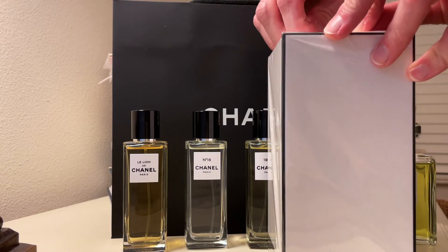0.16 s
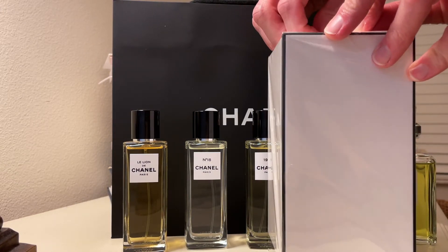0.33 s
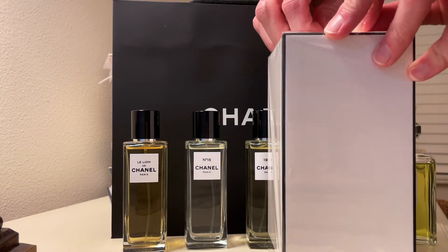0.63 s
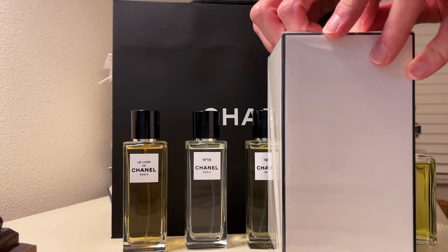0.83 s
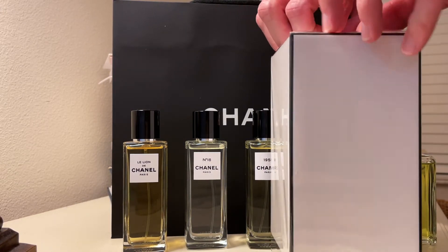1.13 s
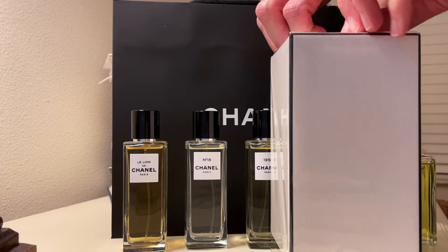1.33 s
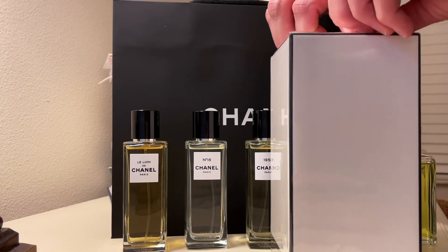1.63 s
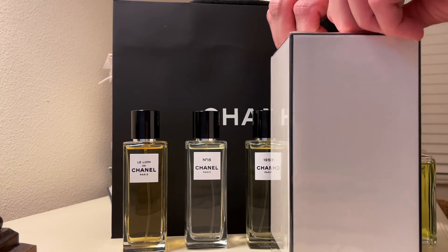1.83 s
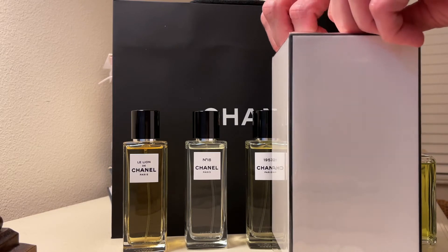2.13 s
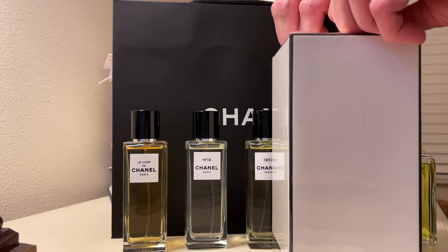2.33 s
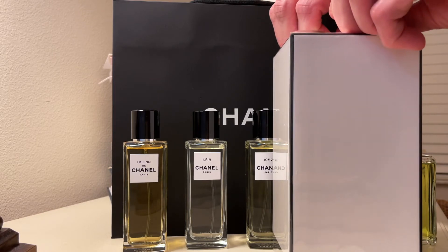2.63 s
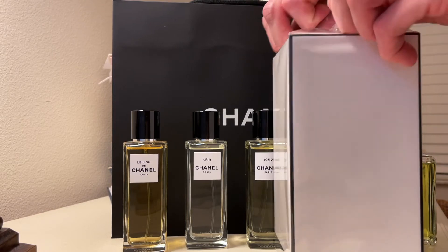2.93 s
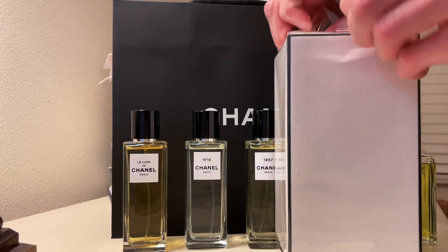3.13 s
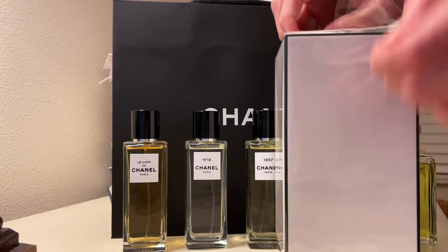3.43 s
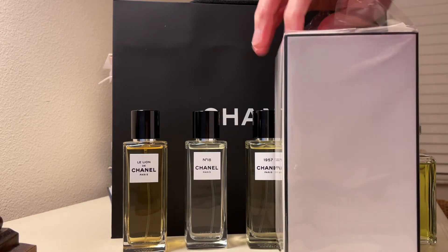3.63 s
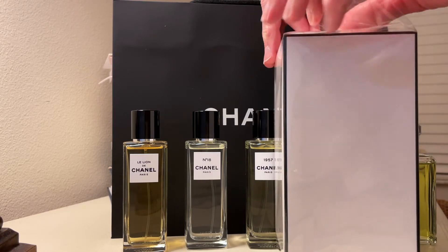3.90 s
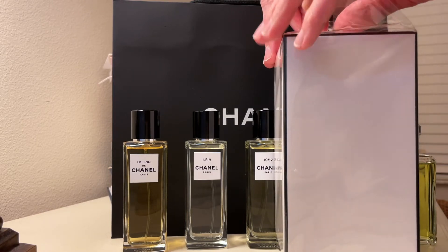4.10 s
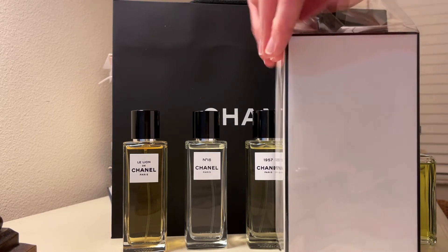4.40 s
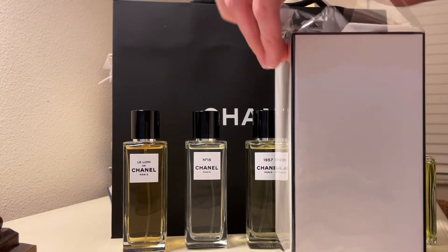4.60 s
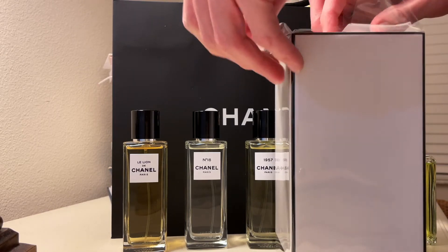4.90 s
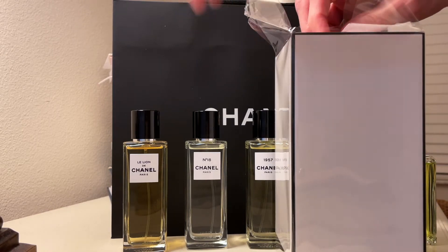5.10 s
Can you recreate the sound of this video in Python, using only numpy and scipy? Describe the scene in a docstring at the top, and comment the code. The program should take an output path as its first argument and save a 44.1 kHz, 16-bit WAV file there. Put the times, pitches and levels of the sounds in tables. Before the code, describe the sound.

A close, dry stereo recording in a quiet room with a very short, faint echo. Fingers pick at thin, stiff plastic film on a cardboard box. From 0 to 0.7 s come quick uneven ticks and crinkles with soft finger rubbing, and some brighter snaps near 0.2, 0.3 and 0.6 s. From 0.7 to 2 s it is sparser: small clicks, dull hollow pats of film on its air pocket, gentle rubs. Crackling thickens from 2.0 to 2.3 s with a sharp snap near 2.25. The strongest burst runs from 2.7 to 3.2 s: hard bright snaps, rapid crackle, boxy knocks and low table thumps, the heaviest around 2.8. It drops to quiet fumbling until 3.7 s, then picks up, with a loud snap at 4.05. Moderate crinkles follow to 4.6 s, including crisp ticks near 4.3 and 4.6, then sparse light rustles and pats fade out by 5.3 s.

```python
"""Thin plastic film on a cardboard box snaps as fingers pick at it and peel it back, close to a two-port microphone.
Each crease is a bright noise tick, a noise-driven ring at its own pitch and a light knock into the box.
Film slaps its air pocket as short decaying tones; fine crackle is a train of tinted puffs over hiss.
Below, random stick-slip grains drive resonances of the pocket, the card walls and the table.
Sparse random echoes add a quiet room."""
import sys
import numpy as np
from scipy import signal
from scipy.io import wavfile
from scipy.ndimage import uniform_filter1d

SR = 44100
rng = np.random.default_rng(int(sys.argv[2]) if len(sys.argv) > 2 else 0)


def persist_wave(psi):
    """Save psi, clipped to +-1, as 16-bit WAV."""
    counts = np.round(np.clip(psi, -1, 1) * 32767).astype(np.int16)
    wavfile.write(sys.argv[1], SR, np.atleast_2d(counts).T)


N = 231694

# creases that snap: t/s, relative ring peak/dB, ring f/Hz, relative tick level/dB, burst time scale/ms
CREASES = [(0.018, -58, 3660, -21.5, 0.45), (0.028, -53, 3420, -28, 1.4), (0.0561, -25, 2540, -20.5, 1.6),
           (0.0792, -50, 3500, -19, 1.44), (0.1324, -38, 2460, -31.5, 2.4), (0.168, -43, 3620, -30.5, 1.24),
           (0.1967, -41, 2800, -33, 1.2), (0.229, -33, 2600, -15, 1.16), (0.2446, -52, 2860, -23.5, 1.2),
           (0.268, -33, 2500, -33, 3.1), (0.3161, -16, 3480, -23.5, 0.71), (0.335, -44, 2600, -44, 0.81),
           (0.3443, -26, 3510, -31, 2.1), (0.373, -36, 2620, -33, 0.78), (0.3784, -26.5, 2470, -25.5, 1.35),
           (0.3905, -21.5, 3320, -44, 1.1), (0.428, -39, 2000, -41, 0.8), (0.437, -37, 3500, -46, 1.5),
           (0.4545, -33, 1730, -43, 1.8), (0.4716, -33.5, 1850, -48, 0.94), (0.4894, -37, 2110, -42, 0.89),
           (0.51, -36.5, 1800, -33, 1.2), (0.5222, -33, 1710, -41, 0.76), (0.5437, -33, 3070, -42, 1.5),
           (0.5601, -35, 1550, -43, 1.2), (0.576, -41, 2800, -44, 1.4), (0.5884, -39, 2200, -43, 0.91),
           (0.6046, -33, 2600, -28, 1.1), (0.6148, -38, 1120, -31, 2.1), (0.6318, -24.5, 2520, -16.5, 0.78),
           (0.7207, -46, 2900, -26.5, 0.6), (0.765, -37, 2190, -37, 0.77), (0.8083, -33, 2460, -34, 1.4),
           (0.8732, -57, 2480, -33.5, 1.35), (0.896, -42.5, 1970, -38.5, 2.3),
           (0.9222, -36, 1610, -31, 2.7), (0.932, -34.5, 2660, -44, 0.89), (0.944, -33.5, 1550, -30, 2),
           (0.9876, -51, 4100, -33.5, 1.16), (1.117, -40, 1180, -55, 3.5), (1.138, -37.5, 3700, -30, 4.8),
           (1.1555, -30.5, 3530, -32, 2.7), (1.296, -36, 2380, -45, 1.6), (1.31, -23.5, 2650, -29.5, 0.77),
           (1.35, -38, 1800, -50, 0.6), (1.386, -38, 2480, -37, 0.84), (1.4019, -39, 2040, -33, 1.45),
           (1.418, -35.5, 2630, -35, 1.4), (1.431, -29, 2580, -29.5, 0.63), (1.509, -29.5, 2340, -19, 1.27),
           (1.5262, -36, 2100, -33, 1.7), (1.555, -37.5, 1700, -49, 1.9), (1.593, -30, 2200, -41, 2.3),
           (1.7036, -50, 2320, -36, 4.8), (1.729, -33.5, 2440, -34, 1.2), (1.769, -35, 2270, -35, 1.97),
           (1.792, -26, 2250, -32, 1.3), (1.8117, -30.5, 3900, -33.5, 5.3), (1.8304, -30, 2020, -49, 1.4),
           (1.847, -35, 2420, -31.5, 1.26), (1.943, -29, 2550, -34, 2.2), (1.978, -32.5, 1860, -30, 3.8),
           (2.041, -22, 2870, -35, 1.9), (2.092, -26.5, 3320, -34, 2.6), (2.111, -26, 2570, -28, 4.5),
           (2.1196, -22, 2220, -26, 1.8), (2.1473, -49, 2670, -25.5, 1.1), (2.16, -26.5, 2130, -42, 2.05),
           (2.172, -29.5, 2230, -26, 2.1), (2.2034, -21.5, 2560, -42, 2.4), (2.219, -49, 3270, -17.5, 1.56),
           (2.237, -26, 2800, -20, 2.5), (2.2514, -22, 2490, -27, 1), (2.2548, -16.5, 3300, -15, 4),
           (2.279, -33, 2190, -34, 1.2), (2.297, -43, 2340, -27.5, 2), (2.3668, -33.5, 2600, -34, 1.2),
           (2.38, -35, 2130, -41, 4.1), (2.4287, -37.5, 1560, -35.5, 2.5), (2.4374, -53, 2500, -30, 0.54),
           (2.486, -36, 1720, -39, 2), (2.513, -26.5, 2250, -33, 1.25), (2.521, -26, 2400, -28, 1.1),
           (2.554, -52, 2500, -30.5, 1.1), (2.611, -26.5, 2400, -32, 2.4), (2.6456, -34, 1590, -23.5, 2.8),
           (2.6618, -22, 1830, -54, 3.6), (2.7168, -17, 1530, -13, 2.84), (2.744, -23.5, 2150, -25, 3.6),
           (2.806, -23, 2030, -17.5, 2.2), (2.8199, -10.5, 2110, -9.5, 2.35),
           (2.8786, -16, 2320, -23, 1.34), (2.894, -49, 4000, -28, 1.8), (2.904, -18, 2340, -26.5, 0.86),
           (2.921, -50, 2530, -44, 0.86), (2.9355, -37, 2570, -24.5, 1.6), (2.9606, -27, 3040, -18, 0.78),
           (2.967, -27, 2300, -42, 0.44), (2.9812, -25, 2130, -40, 0.97), (2.9925, -24, 3200, -33, 0.5),
           (2.9962, -23, 2550, -26, 0.44), (3.0003, -26, 1830, -20.5, 0.57), (3.0171, -22.5, 2470, -24, 3),
           (3.0222, -22.5, 1085, -21.5, 1.2), (3.0313, -17.5, 2440, -28, 0.2),
           (3.0374, -22.5, 1020, -23, 0.71), (3.089, -37, 1490, -25.5, 1.1), (3.098, -29, 1600, -49, 0.73),
           (3.1201, -26.5, 1150, -19.5, 1.74), (3.1443, -19, 3400, -30, 0.68),
           (3.168, -24, 3300, -25, 0.88), (3.1709, -20, 1840, -32, 1.04), (3.184, -11, 2860, -21, 0.48),
           (3.1966, -26, 3700, -26, 2.2), (3.21, -44, 3000, -43, 1), (3.2684, -36.5, 2530, -39, 2.9),
           (3.32, -28, 1740, -48, 0.37), (3.325, -36, 1074, -35, 4.3), (3.433, -37, 1400, -62, 0.24),
           (3.6336, -34.5, 2250, -26.5, 7.6), (3.669, -36, 2630, -32, 4.1), (3.7342, -38, 2580, -44, 0.83),
           (3.746, -34, 2040, -30, 2.4), (3.7514, -27.5, 4760, -23, 1.24), (3.7751, -38, 2860, -27.5, 1.05),
           (3.787, -32.5, 2920, -57, 3.3), (3.799, -34, 2290, -27, 1), (3.811, -34, 3560, -24, 2.1),
           (3.833, -36, 2310, -31, 3.6), (3.8898, -19, 3040, -31, 1.58), (3.8988, -44, 1770, -26.5, 1.7),
           (3.951, -36, 3340, -32.5, 1.35), (3.9562, -29, 3480, -26.5, 0.71), (4.02, -23, 2220, -34, 1.13),
           (4.046, -55, 1950, -35, 2.1), (4.0535, -10.5, 2260, -17.5, 2.58),
           (4.0555, -21.5, 1110, -26, 1.9), (4.153, -28.5, 2530, -37, 1.5), (4.1622, -33, 2620, -45, 2.9),
           (4.168, -29.5, 2740, -45, 3.2), (4.186, -30, 2440, -22, 2.87), (4.2198, -24.5, 1930, -44, 1.1),
           (4.232, -31.5, 2250, -52, 0.98), (4.26, -35, 1840, -52, 1.6), (4.3064, -30, 2150, -26.5, 3.3),
           (4.3389, -25.5, 1940, -14.5, 1.05), (4.3454, -28.5, 1740, -40, 0.93),
           (4.3602, -23.5, 1960, -29, 2.2), (4.3676, -28, 2140, -32, 1.9), (4.382, -33, 2370, -21.5, 1.54),
           (4.4046, -35, 2340, -32, 1.6), (4.4079, -29, 2180, -24.5, 2), (4.4155, -23.5, 2140, -41, 4.3),
           (4.45, -31.5, 1575, -27, 1.97), (4.468, -31, 3570, -34, 1.4), (4.5523, -54, 3330, -21, 1.38),
           (4.6, -37, 1950, -26, 2.2), (4.606, -18, 2300, -18, 1.02), (4.619, -32, 2220, -36, 0.65),
           (4.654, -36, 1500, -31, 0.29), (4.667, -49, 2000, -31, 1.3), (4.688, -51, 2300, -26.5, 0.7),
           (4.706, -29.5, 1810, -34.5, 1.43), (4.741, -46, 2260, -37, 1.5),
           (4.8412, -30.5, 3030, -33.5, 2.2), (4.962, -26.5, 2160, -39, 0.72),
           (4.9793, -54, 1900, -52, 1.2), (5.0507, -40.5, 1560, -34.5, 1.04),
           (5.1208, -38.5, 1800, -42, 4.5), (5.2, -52, 1790, -34, 1.9), (5.215, -52, 1620, -29, 3.3),
           (5.2334, -45, 1590, -32, 1.8)]
# handling curves: t/s, relative fine crackle/dB, relative weight of the hands on the box/dB
HANDLING = [(0.0, -43, -55), (0.47, -49.5, -49), (0.75, -50, -53.5), (1.17, -55, -62.5), (1.67, -46, -57),
            (1.78, -53, -67), (2.0, -53.5, -66), (2.22, -42, -50.5), (2.51, -45.5, -51.5), (2.69, -45, -59),
            (2.88, -37.5, -57), (3.04, -51.5, -57), (3.35, -54, -58), (3.61, -57.5, -57), (3.8, -48.5, -75),
            (3.93, -54, -62.5), (4.34, -57.5, -52.5), (4.56, -49.5, -62), (4.66, -48.5, -56.5),
            (5.25, -64.5, -62)]
# modes of the air under the film: f/Hz, decay width/Hz, relative level/dB
POCKET_MODES = [(677.4, 125, 7), (955, 380, 4), (1606, 460, 2.5), (2250, 420, -2)]
POCKET_LOW_HZ = 424  # the small pocket radiates little below this


def gain_of(db):
    """Amplitude gain of a level in dB."""
    return 10 ** (np.asarray(db) / 20)


def evened(x):
    """Scales to unit RMS."""
    return x / np.sqrt(np.mean(x ** 2) + 1e-20)


def read(points, hz):
    """Interpolates a (Hz, value) table over log frequency."""
    f, value = np.transpose(points)
    return np.interp(np.log(hz + 1), np.log(f + 1), value)


def add(mix, start_s, sound):
    """Adds a sound into the mix in place, cut at the end."""
    part = mix[round(start_s * SR):][:len(sound)]
    part += sound[:len(part)]


def colour(x, points):
    """Minimum-phase filter of unit energy with the given spectrum."""
    level_db = np.maximum(read(points, abs(np.fft.fftfreq(4096, 1 / SR))), -100)
    log_gain = np.log(gain_of(level_db))
    taps = np.fft.ifft(np.exp(np.conj(signal.hilbert(log_gain)))).real[:2048]
    return signal.oaconvolve(x, taps / np.linalg.norm(taps))[:len(x)]


def body(x, modes):
    """Sum of modes that swell and die, unit energy."""
    t = np.arange(8192) / SR
    taps = np.zeros(len(t))
    for hz, width_hz, db in modes:
        envelope = width_hz ** 1.5 * t * np.exp(-np.pi * width_hz * t)
        taps += gain_of(db) * envelope * np.cos(2 * np.pi * hz * t)
    return signal.oaconvolve(x, taps / np.linalg.norm(taps))[:len(x)]


def light(x, low_hz):
    """Drops the bass that thin walls cannot radiate."""
    return signal.sosfilt(signal.butter(3, low_hz, "high", fs=SR, output="sos"), x)


def slips(per_s, spread_db):
    """Random stick-slip releases, a few of them large."""
    size = gain_of(spread_db * np.minimum(rng.exponential(1, N), 4))
    size = size * rng.choice([-1., 1.], N)
    return size * (rng.random(N) < per_s / SR)


def follow(points, column):
    """One handling curve as a gain for every sample."""
    rows = np.transpose(points)
    return gain_of(np.interp(np.arange(N) / SR, rows[0], rows[column]))


def swells(events, column, rise_s, fall_s):
    """Gain that swells at each event and dies away."""
    t, out = np.arange(SR // 4) / SR, np.zeros(N)
    shape = np.minimum(t / rise_s, 1) * np.exp(-np.maximum(t - rise_s, 0) / fall_s)
    for row in events:
        add(out, row[0], gain_of(row[column]) * shape)
    return out


def room(x):
    """Sparse echoes of random sign, each band dying at its own speed."""
    # f/Hz, T60/s
    decay = [(100, 0.24), (600, 0.26), (2500, 0.25), (12000, 0.3)]
    taps = np.zeros(SR // 2)
    at = np.arange(160, SR // 2 - 20, 20)
    taps[at + rng.integers(0, 20, len(at))] = rng.choice([-1., 1.], len(at))
    hz, t, z = signal.stft(taps, SR, nperseg=256)
    fade = gain_of(-60 * t / read(decay, hz)[:, None])
    tail = signal.istft(z * fade, SR, nperseg=256)[1]
    return signal.fftconvolve(x, tail / np.linalg.norm(tail))[:N]


def ports(x):
    """Two ports hear the sound with a phase lead, a balance, and an unlike part, as each crease sits elsewhere."""
    # f/Hz, phase lead of the left port/rad
    lead = [(0, 0), (1980, 0), (2580, .5), (5250, .8), (5600, -.7), (6800, -1.1), (7580, -2.6),
            (9650, -3.7), (12800, -6), (16500, -6.4)]
    # f/Hz, likeness of the ports (0 to 1)
    likeness = [(30, .93), (125, .9), (500, .78), (1500, .9), (3500, .72), (4500, .5), (6000, .35),
                (7500, .87), (11400, .8), (14000, .95)]
    # f/Hz, left minus right level/dB
    balance = [(60, 1), (125, .5), (300, 3), (700, 4.5), (1300, 2), (4400, 2.5), (8000, .3), (15000, 0)]
    hz, t, z = signal.stft(x, SR, nperseg=512, noverlap=384)
    noise = rng.standard_normal((2,) + z.shape)
    a, b = uniform_filter1d(uniform_filter1d(noise, size=25, axis=1), size=5, axis=2)
    unlike = np.exp(1j * np.arctan2(a, b))  # smoothly wandering phase
    like = np.clip(read(likeness, hz), 0, 1)[:, None]
    # lead and balance are split evenly between the ports
    half = (np.exp(.5j * read(lead, hz)) * gain_of(.5 * read(balance, hz)))[:, None]
    left = half + 0 * z
    right = (like + np.sqrt(1 - like ** 2) * unlike) / half
    return signal.istft(z * np.array([left, right]), SR, nperseg=512, noverlap=384)[1][:, :N]


def walls(x):
    """The card walls ring; the firmer the hands brace them, the less bass they give."""
    # wall modes: f/Hz, decay width/Hz, relative level/dB
    wall_modes = [(222, 18.5, -4.5), (343, 350, 13), (942, 160, 0.5)]
    # bracing: t/s, f below which the walls hardly flex/Hz
    bracing = [(0.1, 200), (0.9, 260), (1.1, 234), (1.35, 332), (1.95, 460), (2.3, 235), (3.5, 231),
               (4.4, 217), (4.7, 480)]
    hz, t, z = signal.stft(body(x, wall_modes), SR, nperseg=1024)
    low_hz = np.interp(t, *np.transpose(bracing))
    flexing = z / np.sqrt(1 + (low_hz / (hz[:, None] + 1)) ** 8)
    return signal.istft(flexing, SR, nperseg=1024)[1][:N]


def strokes():
    """Each stroke sets in, holds and lets go: gains for rub and drag, and the share of motion."""
    # fingers rub the film: start/s, length/s, relative rub/dB, relative drag on the walls/dB
    rubs = [(0.008, 0.12, -52, -69), (0.172, 0.13, -53, -56), (0.324, 0.37, -51.5, -48.5),
            (0.691, 0.056, -40.5, -46), (0.766, 0.13, -50.5, -78), (0.916, 0.083, -43, -45),
            (1.058, 0.16, -50.5, -39), (1.225, 0.12, -47, -45), (1.358, 0.068, -50.5, -79),
            (1.425, 0.28, -48, -47), (1.741, 0.13, -48.5, -52), (1.916, 0.44, -48, -70),
            (2.488, 0.022, -41, -62), (2.543, 0.69, -48, -54), (3.248, 0.052, -53, -68),
            (3.303, 0.13, -52.5, -57), (3.533, 0.17, -57, -66), (3.74, 0.061, -49, -44),
            (3.804, 0.052, -42.5, -61), (3.881, 0.031, -41, -48), (4.06, 0.053, -47, -60),
            (4.19, 0.061, -50, -48), (4.276, 0.16, -51, -50), (4.442, 0.08, -52, -65),
            (4.588, 0.21, -56, -78), (4.789, 0.065, -36, -76), (4.905, 0.17, -46.5, -81),
            (5.089, 0.047, -41, -70), (5.175, 0.087, -48.5, -88)]
    rise_s, fall_s = 0.015, 0.05
    rub, drag, moving = np.zeros((3, N))
    for start_s, length_s, rub_db, drag_db in rubs:
        t = np.arange(0, max(length_s, .01), 1 / SR)
        shape = np.clip(np.minimum(t / rise_s, (t[-1] - t) / fall_s), 0, 1)
        add(rub, start_s, gain_of(rub_db) * shape)
        add(drag, start_s, gain_of(drag_db) * shape)
        add(moving, start_s, shape)
    return rub, drag, np.minimum(moving, 1)


def box():
    """Skin slips on the film and stirs the pocket, the walls flex, pushes thump the table."""
    # fingers press the box: t/s, relative flexing of the walls/dB, relative thump on the table/dB
    pushes = [(0.017, -38, -56), (0.232, -39, -76), (0.25, -45, -64), (0.389, -50, -80),
              (0.932, -47, -67.5), (2.121, -39.5, -67), (2.174, -47, -81), (2.258, -35, -47.5),
              (2.382, -41, -90), (2.589, -47, -60), (2.663, -39.5, -82), (2.716, -24, -45),
              (2.819, -18, -35.5), (2.848, -37, -46), (3.007, -49, -48), (3.096, -47, -56),
              (3.18, -27, -42), (3.324, -40, -62), (3.56, -41.5, -51), (3.649, -71, -56), (3.746, -57, -64),
              (3.819, -43, -62), (3.894, -38.5, -53), (4.054, -44, -53.5), (4.079, -53, -71),
              (4.162, -51, -67), (4.307, -34, -84), (4.449, -34, -57), (4.602, -36, -88)]
    # table modes: f/Hz, decay width/Hz, relative level/dB
    table_modes = [(64, 30, 7), (91.3, 80, 16.5), (143, 134, 8)]
    # pocket pitch factors as the film is pressed or lifted
    pitch_shares = [0.905, 0.97, 1.035]
    press_rise_s, wall_fall_s, table_fall_s = 0.0045, 0.0074, 0.019

    rub_gain, drag, _ = strokes()
    skin = gain_of(-68.5) + gain_of(-7.0) * rub_gain  # a faint touch stays between strokes
    grains = skin * evened(slips(per_s=2500, spread_db=4.5))
    # slow noise picks which pocket size sounds
    drift = uniform_filter1d(rng.standard_normal((len(pitch_shares), N)), size=600)
    spot = np.argmax(drift, axis=0)
    rub = np.zeros(N)
    for k, share in enumerate(pitch_shares):
        modes = [(hz * share, width_hz, db) for hz, width_hz, db in POCKET_MODES]
        rub += body(grains * (spot == k), modes)

    weight = follow(HANDLING, column=2)
    wall_press = swells(pushes, column=1, rise_s=press_rise_s, fall_s=wall_fall_s)
    strain = gain_of(-10) * weight + gain_of(-16.5) * drag + gain_of(-6.5) * wall_press
    flex = walls(strain * evened(slips(per_s=1500, spread_db=1.0)))

    table_press = swells(pushes, column=2, rise_s=press_rise_s, fall_s=table_fall_s)
    load = gain_of(-18) * weight + gain_of(3.5) * table_press
    thump = body(load * evened(slips(per_s=1500, spread_db=1.5)), table_modes)
    return light(rub, POCKET_LOW_HZ) + flex + thump


def crackle():
    """Many tiny creases, each a short puff in one of 24 tints, over the hiss of film sliding on film."""
    # f/Hz, relative level/dB
    spectrum = [(300, -61), (1000, -8), (2300, 0), (3500, 1), (4500, -1), (7500, 0), (9000, -3),
                (12300, 2.5), (15200, -11.5), (16500, -115)]
    t, puffs = np.arange(256) / SR, np.zeros(N)
    for hz in np.geomspace(1200, 13000, 24):
        burst = rng.standard_normal(256) * np.exp(-t / 0.0015)
        tint = np.convolve(burst, np.exp(-2.5 * hz * t) * np.cos(2 * np.pi * hz * t))
        puffs += signal.oaconvolve(slips(per_s=11, spread_db=3.0), evened(tint))[:N]
    film = evened(puffs) + gain_of(1.0) * rng.standard_normal(N)
    moving = strokes()[2]
    handled = gain_of(-1.5 - 7 * (1 - moving)) * follow(HANDLING, column=1)  # 7 dB less between strokes
    # each snap sets off crackle that dies away
    stirred = gain_of(-29) * swells(CREASES, column=1, rise_s=0.0015, fall_s=0.02)
    return (handled + stirred) * evened(colour(film, spectrum))


def pats():
    """Film slaps the air under it: a tone swells and rings out, with a scuff of skin on film over it."""
    # time of the top/s, relative peak/dB, pocket f/Hz, rise/ms (held to 2-25)
    slaps = [(0.234, -41, 538, 5.3), (0.398, -42, 680, 6), (0.534, -42.5, 524, 9.6),
             (0.635, -36.5, 593, 3.7), (0.938, -35.5, 580, 3.6), (0.959, -42, 690, 6.7),
             (1.077, -40, 627, 6), (1.133, -33.5, 576, 1.6), (1.175, -38.5, 630, 6), (1.26, -43.5, 586, 5),
             (1.3, -37.5, 582, 9.7), (1.463, -42, 627, 6.9), (1.618, -37, 630, 3.3), (1.996, -38, 635, 6),
             (2.046, -36.5, 672, 6), (2.176, -41, 590, 8), (2.223, -33, 510, 2.1), (2.263, -35, 581, 8),
             (2.387, -34, 710, 4.75), (2.433, -42.5, 578, 4.4), (2.722, -23, 648, 4.36),
             (2.827, -35, 523, 9), (2.864, -29, 680, 4.9), (2.885, -31.5, 683, 5), (3.046, -28, 636, 3.1),
             (3.127, -36, 677, 4.6), (3.189, -41, 474, 8), (3.207, -36, 685, 2.8), (3.274, -44, 624, 6.1),
             (3.535, -43, 630, 13), (3.563, -38.5, 660, 8.13), (3.592, -39.5, 632, 8),
             (3.638, -40.5, 716, 2.5), (3.75, -39, 670, 3.8), (3.779, -36.5, 650, 2.2),
             (4.061, -37, 538, 8), (4.37, -40.5, 854, 4), (4.456, -49, 440, 7), (4.708, -38, 680, 2.5),
             (4.726, -36, 692, 13.6), (4.821, -41, 570, 21), (4.937, -35, 686, 6), (5.003, -37.5, 640, 8.8),
             (5.018, -42, 624, 8.5), (5.221, -41, 670, 3.2)]
    tone, scuff = np.zeros((2, N))
    t = np.arange(2048) / SR
    chance = rng.standard_normal((len(slaps), 2))
    for (top_s, db, hz, rise_ms), (glide, phase) in zip(slaps, chance):
        rise_s = np.clip(rise_ms, 2, 25) / 1000
        swell = np.sin(np.pi / 2 * t / rise_s) ** 2
        with np.errstate(invalid="ignore"):  # the fall is used only after the top
            fall = np.exp(-((t - rise_s) / 0.0027) ** 0.72)
        shape = gain_of(db) * np.where(t < rise_s, swell, fall)
        cycle = np.sin(2 * np.pi * hz * t * (1 + 0.1 * glide * t) + 6 * phase)
        add(tone, top_s - rise_s, shape * cycle)
        add(scuff, top_s - rise_s, shape)
    rough = body(scuff * rng.standard_normal(N), POCKET_MODES)
    return light(gain_of(-1.5) * tone + gain_of(-6.0) * rough, POCKET_LOW_HZ)


def snaps():
    """A crease buckles in a burst: a brief bright tick, its own ring, and a light knock into the box."""
    # f/Hz, relative level/dB
    tick_spectrum = [(1500, -5.5), (3000, -1.5), (6000, -4), (7500, 4.5), (9000, 5.5), (12300, 3),
                     (15200, -5.5), (16500, -37)]
    build = 0.35  # build-up, in burst time scales
    buckle = 2.8  # first jump against the ragged burst
    ring_width = 0.79  # decay width as a share of the pitch
    # ring drive: steady flutter, its phase drift [rad per sample, RMS], noise
    flutter, wander_rad, ragged = 0.24, 0.14, 0.97

    ticks, rings, knocks = np.zeros((3, N))
    t = np.arange(2048) / SR
    noise = rng.standard_normal((len(CREASES), 2, 2048))
    for (start_s, ring_db, hz, tick_db, burst_ms), (a, b) in zip(CREASES, noise):
        u = t * 1000 / np.clip(burst_ms, .3, 8)
        # the crease gives way after a short build-up
        jump = buckle * signal.unit_impulse(len(t), idx=int(np.argmax(u > build)))
        rise = np.minimum(u / build, 1) ** 1.05
        rustle = 0.091 * np.exp(-t / 0.0035)  # the film settles in a ragged tail

        wobble = np.cos(2 * np.pi * hz * t + wander_rad * np.cumsum(b))
        drive = ragged * b + flutter * wobble + 2 * jump
        burst = rise * (np.exp(-u ** 0.88) * drive + rustle * a)
        mode = t * np.exp(-np.pi * ring_width * hz * t) * np.cos(2 * np.pi * hz * t)
        ring = np.convolve(burst, mode[:256])
        add(rings, start_s, gain_of(ring_db) * ring / abs(ring).max())

        spiky = a * abs(b) + jump
        tick_shape = rise * (np.exp(-(u / 0.85) ** 0.71) + 0.47 * rustle)
        add(ticks, start_s, gain_of(tick_db) * tick_shape * spiky)
        add(knocks, start_s + 0.00265, gain_of(ring_db - 6.5) * signal.unit_impulse(4))
    # a small crease moves little air in the bass
    thin = signal.butter(2, 600, "high", fs=SR, output="sos")
    return signal.sosfilt(thin, rings) + colour(ticks, tick_spectrum) + walls(knocks)


def scene():
    """Sums the close sounds and their room, heard by two ports."""
    near = snaps() + pats() + crackle() + box()
    return ports(near + gain_of(-13) * room(near))


def record(dry):
    """The small microphone drops the deepest bass; then the band limit of the recorder."""
    mic_low_hz, edge_hz = 62, 16700
    lean = signal.sosfilt(signal.butter(3, mic_low_hz, "high", fs=SR, output="sos"), dry)
    band = signal.firwin(511, edge_hz, window=("kaiser", 9), fs=SR)
    return signal.oaconvolve(lean, band[None], "same")


dry = scene()
out = record(dry)
persist_wave(out)
```